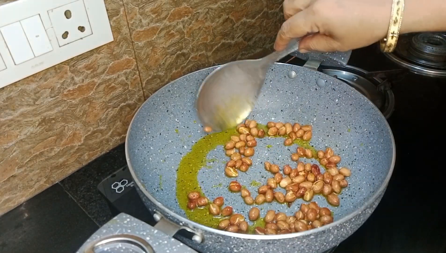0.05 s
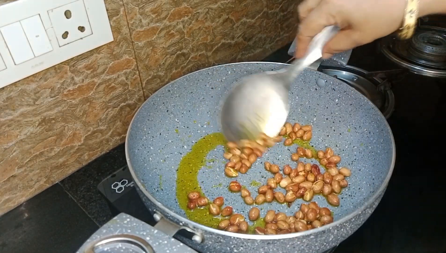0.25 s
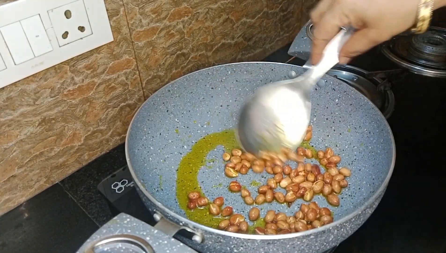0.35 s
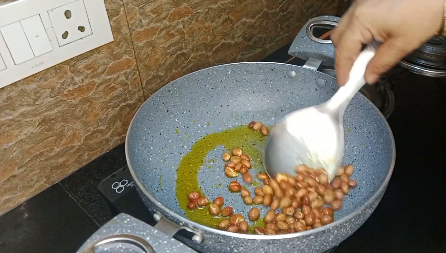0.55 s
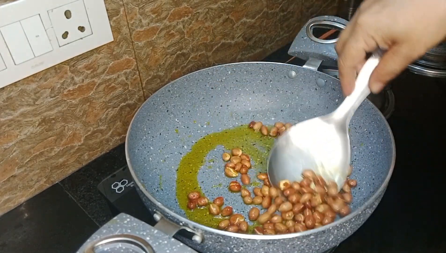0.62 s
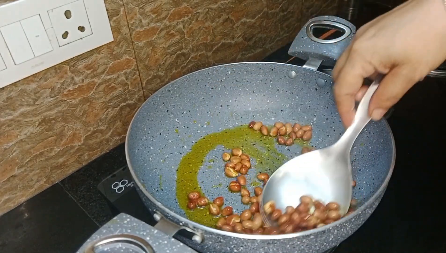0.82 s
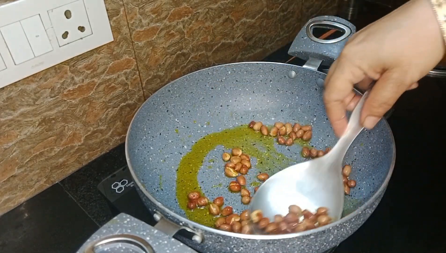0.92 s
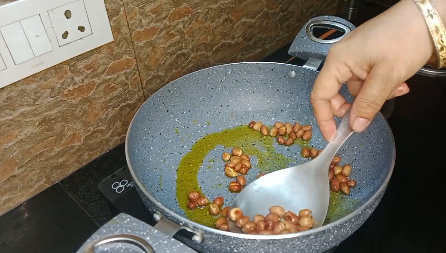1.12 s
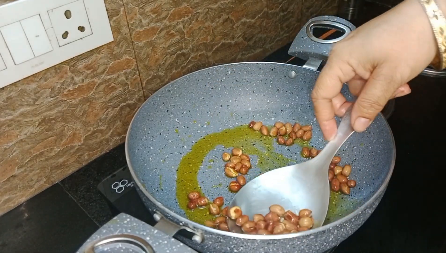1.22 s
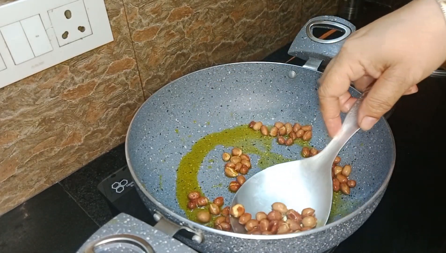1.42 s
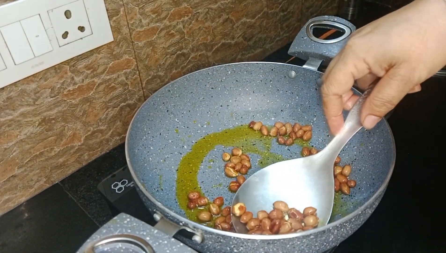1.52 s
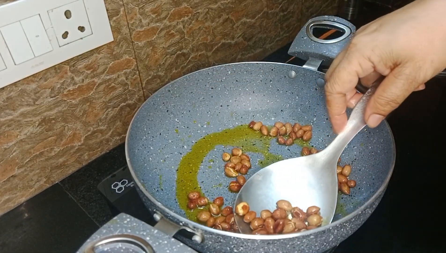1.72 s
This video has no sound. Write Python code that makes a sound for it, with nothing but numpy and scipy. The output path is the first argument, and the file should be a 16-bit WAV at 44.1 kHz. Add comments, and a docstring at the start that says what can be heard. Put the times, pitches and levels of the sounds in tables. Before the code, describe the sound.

A steel ladle scrapes a frying pan, pushing rattling roasted peanuts, with one hard clank midway

```python
"""Ladle and peanuts in a pan

A small kitchen, one close microphone at the stove: a steel ladle scrapes a coated frying pan, pushes
roasted peanuts, clanks on the wall and scoops. Dense random slips and single knocks ring tuned modes;
the nuts tick as short high tones with a noise snap, and dry skins rustle in clicks. Oil fizzes as noise
pulsed by tiny pops, the hob hums as a wavering sine, and a short noise tail gives the room.
"""
import sys
import numpy as np
from scipy import signal
from scipy.fft import rfft, irfft
from scipy.io import wavfile
from scipy.ndimage import uniform_filter1d, map_coordinates

SR = 44100
rng = np.random.default_rng(int(sys.argv[2]) if len(sys.argv) > 2 else 0)


def master(y):
    """Save y as 16-bit WAV."""
    cut = np.clip(np.atleast_2d(y).T, -1, 1)
    pcm = np.round(cut * 32767)  # scale
    wavfile.write(sys.argv[1], SR, pcm.astype(np.int16))


N = 77175  # samples, 1.75 s


def undb(db):
    """Decibels to gain."""
    return 10 ** (np.asarray(db) / 20)


def unit(x):
    """Scale to rms 1."""
    return x / np.sqrt(np.mean(x ** 2) + 1e-18)


def clock():
    """Time in seconds."""
    return np.arange(N) / SR


def noise():
    """White noise."""
    return rng.standard_normal(N)


def curve(times, db):
    """Gain along a level curve, straight in dB between its points."""
    return undb(np.interp(clock(), times, db))


def fall(t60):
    """Exponential decay by 60 dB in t60 seconds."""
    return np.exp(-np.log(1000) * clock() / max(t60, 1e-4))


def at(x, start):
    """Delay a sound to its start time in seconds."""
    return np.concatenate([np.zeros(max(int(start * SR), 0)), x])[:N]


def through(x, response):
    """Drive a resonator or room by convolution."""
    return signal.fftconvolve(x, response)[:N]


def bandpass(x, low_hz, high_hz):
    """Keep one band of frequencies."""
    return signal.sosfilt(signal.butter(3, [low_hz, high_hz], "band", fs=SR, output="sos"), x)


def colour(x, points):
    """Shape the spectrum by (frequency [Hz], level [dB]) points; rms 1."""
    hz, db = np.array(points).T
    f = np.maximum(np.arange(N // 2 + 1) * SR / N, 1)
    gain = undb(np.interp(np.log(f), np.log(hz), db))
    return unit(irfft(rfft(x) * gain, N))


def clicks(rate, spread_db):
    """Random clicks of unequal size and either sign, at a mean rate per second; rms 1."""
    chance = rng.random(N)
    size = rng.exponential(size=N)
    sign = rng.choice([-1, 1], N)
    return unit((chance < rate / SR) * sign * undb(spread_db * np.minimum(size, 4)))


SLIPS_PER_S, SLIP_SPREAD_DB = 1000, 4


def dense_clicks():
    """Clicks at twice the rate of the scraping slips."""
    return clicks(SLIPS_PER_S * 2, SLIP_SPREAD_DB)


def ring(modes, damping=1):
    """Decaying modes after one blow; damping divides every decay time."""
    t = clock()
    return sum(undb(db) * fall(t60 / damping) * np.sin(2 * np.pi * hz * t) for hz, db, t60 in modes)


# Close to the pan, colour of fizz and dry skins: (frequency [Hz], relative level [dB])
FIZZ_COLOUR = [(2500, -4.5), (4700, -17), (5400, 11), (6300, -4), (7600, 1.5), (9400, -30.5), (10400, -13),
               (12600, -4), (15800, -1.5)]
# Close over the oil, its fizz from start to end: (time [s], level [dB])
FIZZ_LEVEL = [(0, -78.5), (.4, -74.5), (.7, -72), (.8, -69), (1.08, -65.5), (1.13, -65), (1.26, -70),
              (1.4, -67), (1.55, -77.5), (1.62, -61.5), (1.75, -78)]


def oil(pop_t60=0.024, hiss=0.24):
    """Tiny pops of hot oil pulse a noise over a soft hiss, along a set level curve."""
    pops = unit(through(clicks(160, 5) ** 2, fall(pop_t60)))
    fizz = noise() * np.sqrt(np.abs(pops) + hiss ** 2)
    return colour(fizz, FIZZ_COLOUR) * curve(*np.array(FIZZ_LEVEL).T)


HUM_HZ = 96.5
# Low hum under the pan: (time [s], level [dB])
HUM_LEVEL = [(0, -84), (.15, -62), (.28, -67), (.47, -43.5), (.62, -71), (1.38, -81), (1.53, -61.5),
             (1.68, -80), (1.75, -65)]
# Still air of the kitchen around the microphone: (frequency [Hz], relative level [dB])
AIR_COLOUR = [(20, -18), (60, 6), (160, -7), (1000, -15), (2200, -18), (4000, -22.5), (9000, -42)]
AIR_DB = -70


def hob(waver=0.036, rumble_db=-10):
    """A low sine hum that swells and wavers in pitch, with a rumble under it, and still air."""
    drift = colour(noise(), [(12, 0), (40, -40), (200, -90)])
    cycles = np.cumsum(HUM_HZ * (1 + waver * drift)) / SR
    hum = np.sqrt(2) * np.sin(2 * np.pi * cycles)
    rumble = colour(noise(), [(20, -24.5), (55, 1.5), (160, -8), (600, -51.0)])
    low = (hum + undb(rumble_db) * rumble) * curve(*np.array(HUM_LEVEL).T)
    return low + undb(AIR_DB) * colour(noise(), AIR_COLOUR)


TICK_HZ, TICK_T60_S = 5514, 0.014
# Close to the pan, nuts against the steel: (time [s], level before the lowpass [dB])
TICKS = [(0.059, -53.5), (0.5955, -27.5), (.606, -37), (1.021, -44), (1.079, -56), (1.168, -46),
         (1.257, -39), (1.637, -54)]


def nuts(snap_db=-8, snap_top_hz=7500):
    """Hard little ticks: a short high ring and a snap of dry skin, softened by a lowpass."""
    tone = np.sin(2 * np.pi * TICK_HZ * clock()) * (1 - fall(0.0014))
    ticks = np.zeros(N)
    for start, db in TICKS:
        snap = undb(snap_db) * colour(noise(), FIZZ_COLOUR)
        ticks += at(undb(db) * fall(TICK_T60_S) * (tone + snap), start)
    return signal.sosfilt(signal.butter(2, min(snap_top_hz, .4 * SR), fs=SR, output="sos"), ticks)


# Bands of ladle and pan, in order bass, pan body, ladle bowl, ladle overtones, edge, zing:
# (low edge [Hz], high edge [Hz])
REGISTERS = [(200, 500), (660, 1050), (1120, 1460), (1650, 2380), (2850, 4400), (5100, 6200)]
# Ladle resting on the pan, undamped: (frequency [Hz], relative level [dB], t60 [s])
LADLE_MODES = [(295, 7, 0.03), (365, 2.5, .04), (470, -1.5, 0.058), (775.5, 14, 0.062), (831, 9, 0.21),
               (916, 13.5, .07), (1189, -6, 0.11), (1295, 18, 0.054), (1395, -3, 0.099), (1773, 6, 0.087),
               (1848.6, 11, .06), (1953, 7, 0.029), (2073, 2, 0.068), (2184, -3.5, 0.031),
               (3020, 4.5, 0.027), (3460, 5.5, 0.023), (3800, -2.5, 0.015), (4190, -6, 0.014),
               (5380, 14.5, 0.044), (5550, -2.5, 0.029), (5750, 0.5, 0.039)]


def registers(damping=1):
    """The ring of ladle and pan, one response of nearby modes for each register."""
    responses = []
    for low, high in REGISTERS:
        modes = [mode for mode in LADLE_MODES if low * .95 <= mode[0] < high * 1.05]
        responses.append(bandpass(ring(modes, damping), low, high))
    return responses


KNOCK_DAMPING, KNOCK_GRIT_DB, KNOCK_GRIT_S = 1.74, -2, 0.0083  # grit falls to 1/e in KNOCK_GRIT_S
KNOCK_DB = -2  # trim on all knocks in the mix
# Ladle knocks close to the microphone, drive of each register before the trim:
# (time [s], ladle bowl [dB], overtones [dB], edge [dB], zing [dB])
KNOCKS = [(.2098, -41, -39, -66, -65), (.6980, -41, -39, -46, -49), (.8565, -48, -39, -49, -59),
          (.9890, -38, -42, -63, -60), (1.2432, -58, -48, -58, -56), (1.4540, -64, -61, -61, -62),
          (1.5380, -74, -61, -72, -71), (1.6015, -72, -57, -73, -59)]


def knocks():
    """Each knock is one push and a short burst of grit; the contact point sets the colour."""
    rings = [r / np.sqrt(np.mean(r[:SR // 50] ** 2)) for r in registers(KNOCK_DAMPING)[2:]]
    drive = np.zeros((len(rings), N))
    for start, *levels_db in KNOCKS:
        grit = noise() * np.exp(-clock() / KNOCK_GRIT_S)
        impulse = clock() == 0
        push = grit / np.linalg.norm(grit) * undb(KNOCK_GRIT_DB) + impulse
        drive += undb(levels_db)[:, None] * at(push, start)
    onset = 1 - fall(0.0029)
    return undb(KNOCK_DB) * sum(through(d, r * onset) for d, r in zip(drive, rings))


CRUNCH_DB, CRUNCH_T60_S = -2.5, 0.074  # level against the zing drive of the knock


def crunch():
    """Every knock jostles the nuts: their dry skins rustle for a moment."""
    out = np.zeros(N)
    for start, *_, zing_db in KNOCKS:
        rustle = colour(dense_clicks(), FIZZ_COLOUR) * fall(CRUNCH_T60_S)
        out += at(undb(zing_db + CRUNCH_DB) * rustle, start)
    return out


LANDING_T60_S = 0.081
# Ladle down on the pan floor: (time [s], level before the soft onset [dB], frequency [Hz])
LANDINGS = [(.211, -44.5, 412.4), (.858, -29, 691)]


def landings():
    """The pan floor gives one low note, with a soft onset, when the ladle comes down on it."""
    onset = 1 - fall(0.026)
    return sum(at(ring([(hz, db, LANDING_T60_S)]) * onset, start) for start, db, hz in LANDINGS)


FADE_S = 0.0099
# Ladle strokes close to the pan, a push, a slide up the wall, a scoop:
# (time [s], scraping level in the ladle bowl [dB])
PUSH = [(0.214, -38.5), (0.257, -38), (0.274, -38.5), (0.344, -34.5), (0.359, -54), (0.386, -35),
        (0.448, -31.5), (0.453, -26), (0.488, -29), (0.54, -39), (0.562, -28), (0.593, -34.5)]
SLIDE = [(0.638, -32.5), (0.697, -31.5), (.735, -44.5), (.79, -49), (0.846, -61.5)]
SCOOP = [(.868, -44), (0.976, -49), (0.998, -37), (1.055, -48), (1.073, -43), (1.113, -57), (1.206, -66.5),
         (1.255, -55.5), (1.323, -61)]
# Colour of push, slide and scoop against the ladle bowl:
# (bass [dB], pan body [dB], overtones [dB], edge [dB], zing [dB])
STROKE_COLOUR = [(-30.5, -7.5, -8.5, -31.5, -34.5), (-29, -12.5, -6.5, -18.5, -31.5),
                 (-22.5, -17.5, -4, -22.5, -15.5)]
# Growth of those same five registers: (level per scraping level [dB/dB])
GROWTH = [0.23, 1.417, 1.084, 0.83, 0.62]


def stroke(table, offsets, rings):
    """Dense slips ring each register at a wandering pitch; each grows with pressure at its own rate."""
    times, db = np.array(table).T
    gate = np.interp(clock(), [times[0] - FADE_S, times[0], times[-1], times[-1] + FADE_S], [0, 1, 1, 0])
    mean_db = db.mean()
    levels = [mean_db + offset + growth * (db - mean_db) for offset, growth in zip(offsets, GROWTH)]
    levels.insert(2, db)  # the ladle bowl follows the scraping level itself
    slips = clicks(SLIPS_PER_S, SLIP_SPREAD_DB)
    out = np.zeros(N)
    for response, level in zip(rings, levels):
        wander = unit(uniform_filter1d(noise(), size=900))
        positions = np.cumsum(1 + .02 * wander)  # uneven reading speed bends the pitch
        rub = unit(map_coordinates(through(slips, response), [positions], mode="mirror"))
        # even out the loudness over about 20 ms, so that the curve sets it
        steady = np.sqrt(np.abs(uniform_filter1d(rub ** 2, size=900)) + .01)
        out += rub / steady * curve(times, level)
    return out * gate


def scrape():
    """The three strokes of the ladle ring the same ladle and pan."""
    rings = registers()
    return sum(stroke(table, offsets, rings)
               for table, offsets in zip([PUSH, SLIDE, SCOOP], STROKE_COLOUR))


CHIRP_HZ, CHIRP_WIDTH_S = 1284, 0.0042  # width from the peak down to 1/e
# Friction chirps close to the pan: (time of peak [s], level [dB])
CHIRPS = [(.3, -32), (.3135, -28), (.3285, -23.5), (.371, -28), (1.3335, -33)]


def chirps():
    """Friction briefly locks onto the note of the ladle bowl: one sine in short swells."""
    t = clock()
    swells = sum(undb(db) * np.exp(-((t - peak) / CHIRP_WIDTH_S) ** 2) for peak, db in CHIRPS)
    return swells * np.sin(2 * np.pi * CHIRP_HZ * t)


CLANK_S, CLANK_DB, CHATTER_T60_S = .6056, -20, .17
CRACK_HZ, CRACK_S, CRACK_DB = 1450, 0.00064, -6.5  # envelope tops out at half CRACK_S, half of CRACK_DB gain
# Pan wall struck hard, before the clank level: (frequency [Hz], relative level [dB], t60 [s])
WALL_MODES = [(492.6, -22, 0.18), (739, -19, 0.13), (746, -8, 0.24), (973, -8, 0.23), (1035.3, -2, 0.13),
              (1219.4, -1.5, 0.098), (1764, -1.5, 0.025), (1720, -9.5, 0.052), (2016, -7, 0.12),
              (2415, 2.5, 0.025), (2880, -36, 0.026), (3787, 0.5, 0.011)]


def clank(chatter_db=-9):
    """The ladle hits the pan wall: a crack, the ring of the wall, and chatter as it rebounds."""
    t = clock()
    envelope = t / CRACK_S * np.exp(1 - t / CRACK_S * 2)
    crack = undb(CRACK_DB) * np.sin(2 * np.pi * CRACK_HZ * t) * envelope
    wall = bandpass(undb(CLANK_DB) * ring(WALL_MODES) + crack, 450, 4000)
    chatter = colour(dense_clicks(), [
        (100, -24.5), (200, -7.5), (680, 10.5), (900, 9.5), (2400, 4.0), (3100, 0),
        (3900, -1.5), (4700, -13), (5500, -4.5), (6500, -29.5), (8800, -28.5), (9600, -59.5)])
    return at(wall + undb(CLANK_DB + chatter_db) * chatter * fall(CHATTER_T60_S), CLANK_S)


SHUDDER_HZ, SHUDDER_SAG_HZ_PER_S = 1271, 3200
SHUDDER_ROUGH, SHUDDER_RUB_DB = .02, -8  # rms pitch wobble as a fraction; rub against the squeak
# Ladle shuddering to a stop, close to the pan: (time [s], length [s], level [dB])
SHUDDER = (1.338, 0.043, -43)


def shudder(octave_db=-9):
    """A brief stick-slip squeak that sags in pitch as the ladle stops."""
    start, length, db = SHUDDER
    t = np.minimum(clock(), length)
    wobble = unit(uniform_filter1d(noise(), size=60))
    pitch = (SHUDDER_HZ - SHUDDER_SAG_HZ_PER_S * t) * (1 + SHUDDER_ROUGH * wobble)
    phase = 2 * np.pi * np.cumsum(pitch) / SR
    squeak = np.sin(phase) + undb(octave_db) * np.sin(2 * phase)
    rub = colour(noise(), [(150, -16), (1150, -3), (2100, 3), (2900, -22), (12000, -60)])
    swell = np.sin(np.pi * t / length)
    return at(undb(db) * swell * (squeak + undb(SHUDDER_RUB_DB) * rub), start)


ROOM_T60_S, ROOM_DB, ROOM_GAP_S = 0.19, -8, .004


def kitchen(x):
    """Close tiled walls add a short tail of decaying noise after a small gap."""
    walls = colour(noise(), [(100, 1.0), (500, -2.5), (4000, -3.5), (12000, -5.5)])
    tail = at(walls * fall(ROOM_T60_S), ROOM_GAP_S)
    return x + undb(ROOM_DB) * through(x, tail / np.linalg.norm(tail))


def scene():
    """Ladle, nuts and oil in the kitchen, over the hum."""
    ladle = knocks() + landings() + scrape() + chirps() + clank() + shudder()
    pan = oil() + nuts() + crunch() + ladle
    return (kitchen(pan) + hob())[None]


TOP_HZ = 15700


def record(dry):
    """The recorder cuts the top with a steep lowpass."""
    return signal.sosfilt(signal.ellip(10, .2, 70, TOP_HZ, fs=SR, output="sos"), dry)


dry = scene()
out = record(dry)
master(out)
```